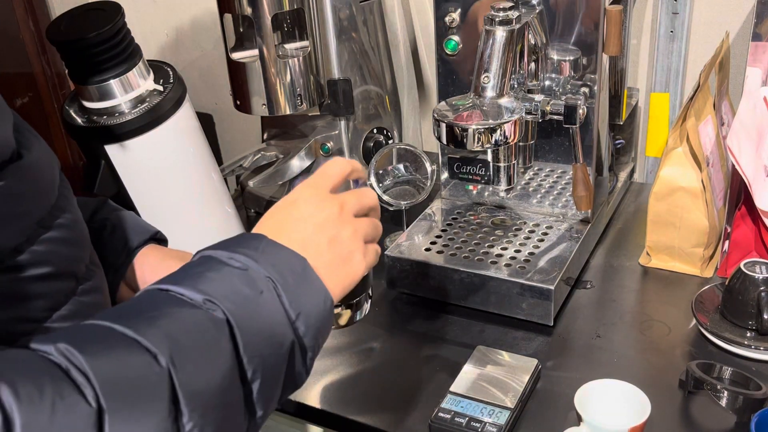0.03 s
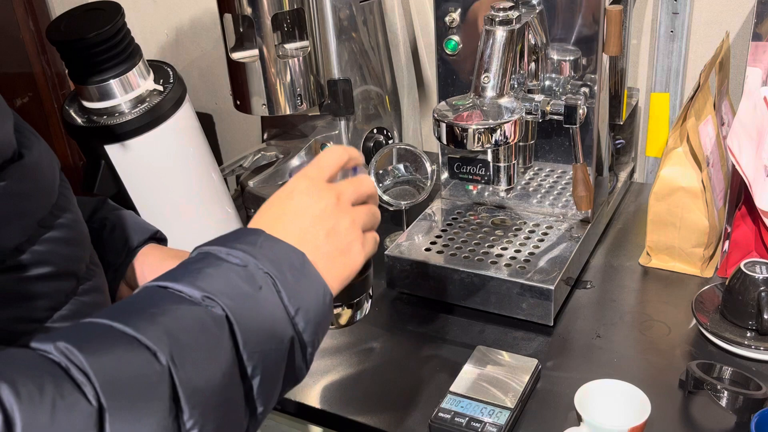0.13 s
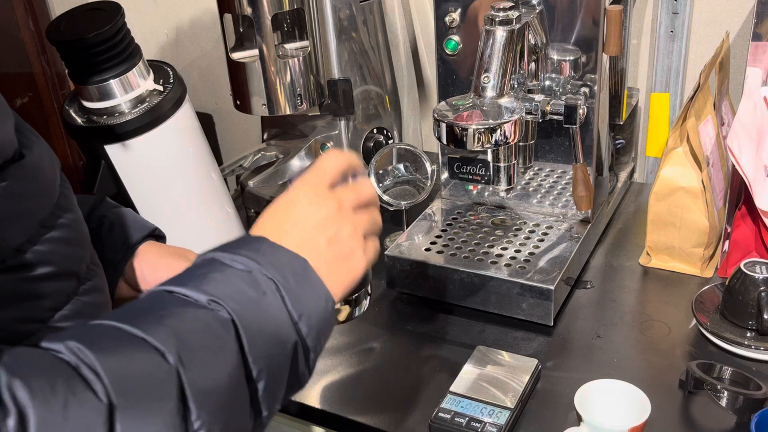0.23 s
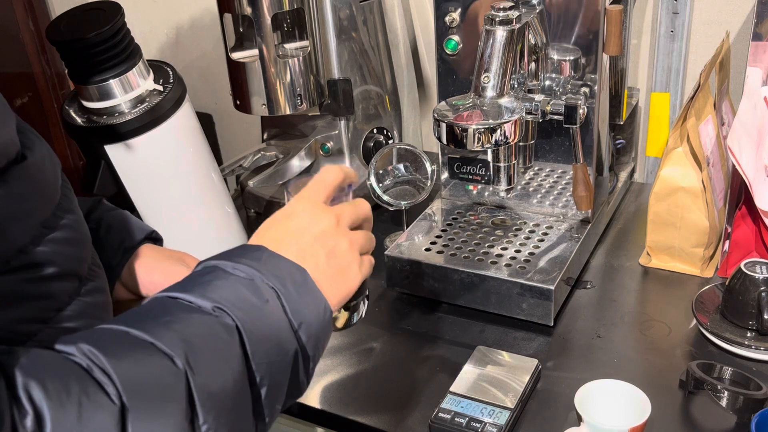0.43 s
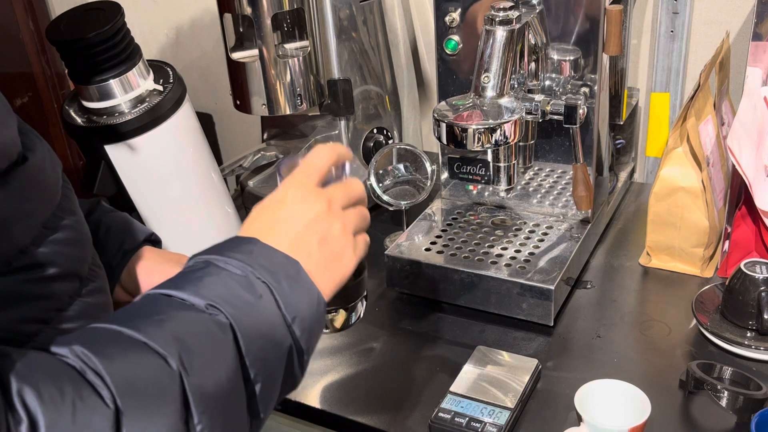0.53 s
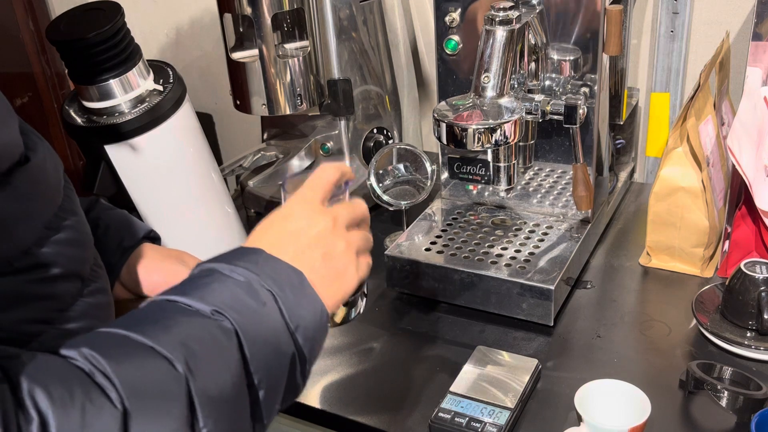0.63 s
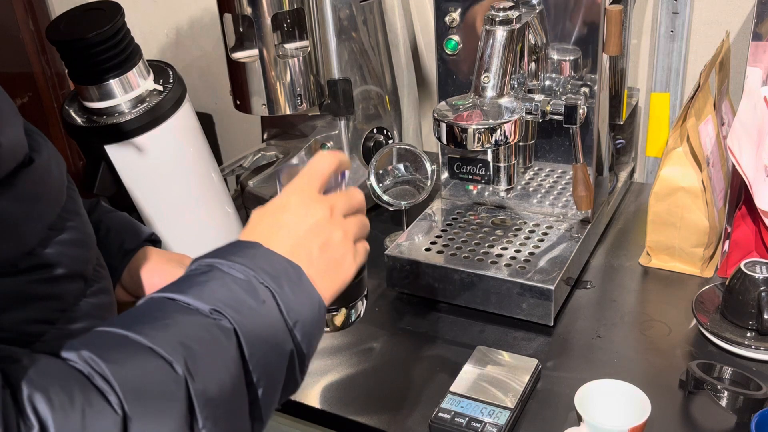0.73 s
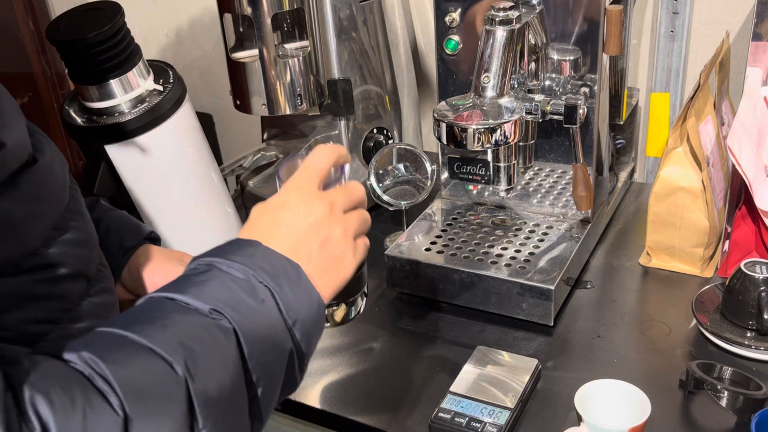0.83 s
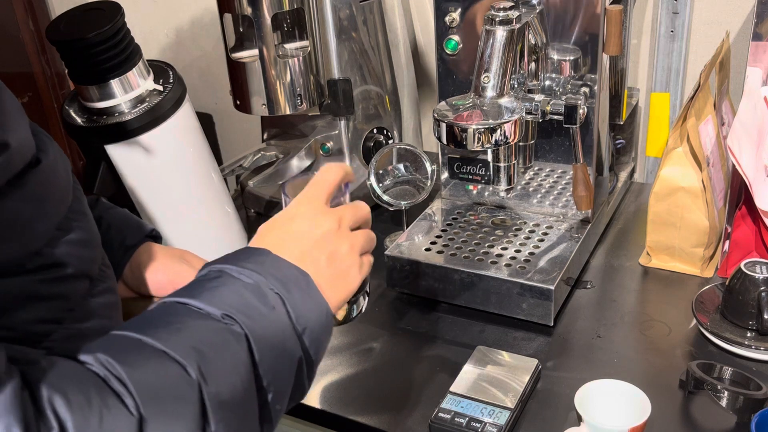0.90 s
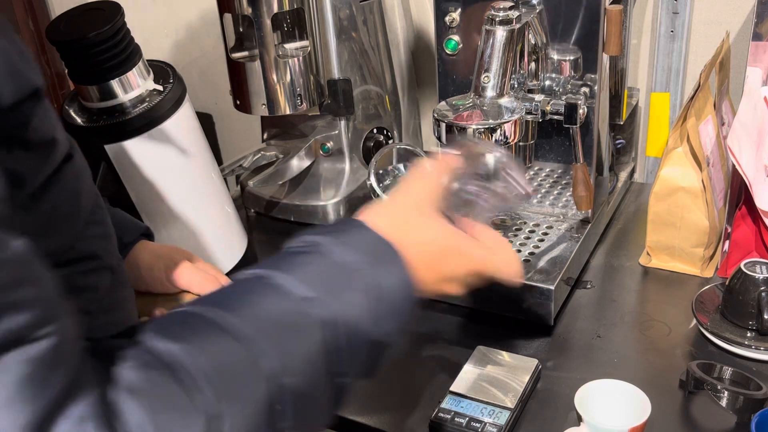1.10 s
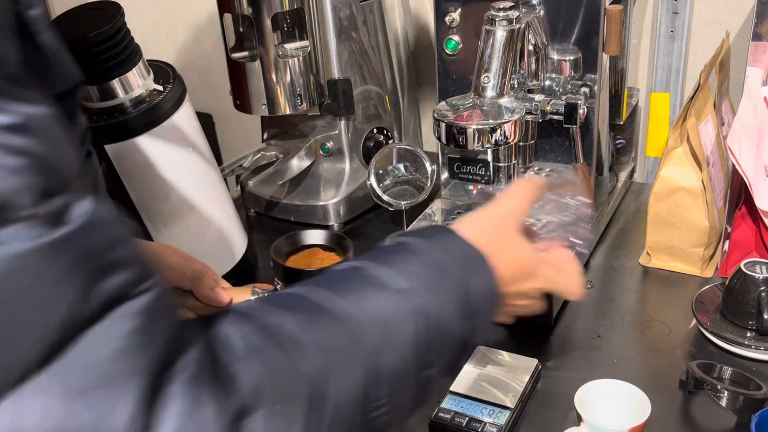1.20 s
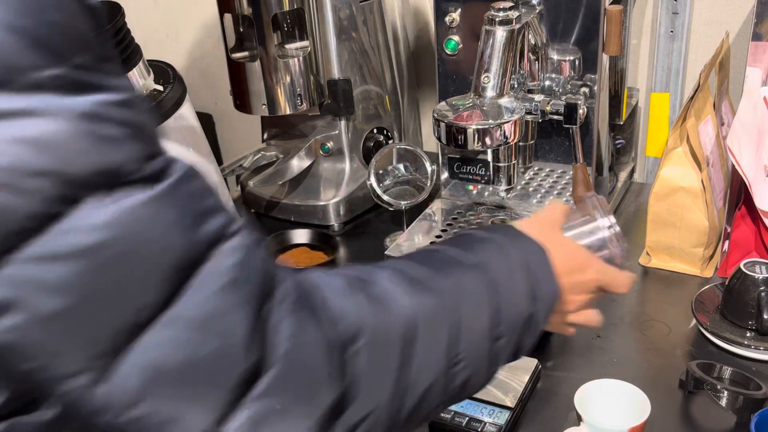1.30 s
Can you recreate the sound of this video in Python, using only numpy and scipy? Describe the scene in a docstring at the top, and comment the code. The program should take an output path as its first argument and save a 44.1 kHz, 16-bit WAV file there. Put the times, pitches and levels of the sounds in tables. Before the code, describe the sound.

A plastic cup knocks four times, quickly and evenly, on a metal coffee basket, each a sharp clatter with a hollow thud and brief ring. A faint sleeve rustle follows, close by in a small, quiet kitchen.

```python
"""Knocking a plastic cup empty

A plastic dosing cup scrapes into place, upside down on a metal coffee basket, and is knocked four times.
Each knock is a quick clatter of the rim over a hollow thud. Cup and basket ring briefly,
over a low lingering note of the small, quiet kitchen; machine, counter and room add echoes.
A sleeve rustles, and a faint brush follows as the cup is carried off."""
import sys
import numpy as np
from scipy import signal
from scipy.fft import rfft, irfft
from scipy.io import wavfile

SR = 44100
rng = np.random.default_rng(int(sys.argv[2]) if len(sys.argv) > 2 else 0)


def wav_out(sig):
    """Save sig, one row per channel (or a flat mono array), as 16-bit PCM at SR to the path in sys.argv[1]."""
    wavfile.write(sys.argv[1], SR, np.round(np.clip(np.atleast_2d(sig).T, -1, 1) * 32767).astype(np.int16))


N = 59535

# The tone of a touch on the cup. Each row: frequency in Hz, level in dB.
CONTACT_TONE = [(200, -19), (330, -2.5), (800, -4.5), (1150, -5), (1450, -6), (2000, -2), (2750, -7.5),
                (3700, 5), (4600, -1.5), (5700, -2.5), (6750, 0.5), (7400, -0.5), (8200, 6), (9100, -4),
                (10200, -0.5), (11500, -1), (13000, -22.5), (15200, -2)]


def gain(db):
    """Turn decibels into a number to multiply by."""
    return 10 ** (np.asarray(db) / 20)


def at_hz(points, hz):
    """Read a value between rows of (Hz, value), with octaves evenly spaced."""
    freqs, values = np.array(points, float).T
    return np.interp(np.log(np.maximum(hz, 1)), np.log(freqs), values)


def frequencies():
    """The frequencies in Hz at which the filters work."""
    return np.arange(N + 1) * SR / (2 * N)


def shape(sound, db):
    """Turn each frequency up or down by its own number of dB."""
    cepstrum = irfft(np.log(gain(db)))
    # folding the second half onto the first keeps the filter from sounding early
    cepstrum[1:N] *= 2
    cepstrum[N + 1:] = 0
    return irfft(rfft(sound, 2 * N) * np.exp(rfft(cepstrum)))[..., :N]


def since(start):
    """Seconds since a moment, zero before it."""
    return np.maximum(np.arange(N) / SR - start, 0)


def fade(start, fade_s):
    """Start suddenly, then die away. The fade time is how long a drop of 60 dB takes."""
    t = since(start)
    return (t > 0) * np.exp(-np.log(1000) * t / fade_s)


def noise(width):
    """Stereo hiss: width 0 is the same in both ears, width 1 is unrelated."""
    mid, side = rng.standard_normal((2, N))
    return np.array([mid + width * side, mid - width * side]) / np.sqrt(1 + width ** 2)


def shaped_noise(tone, width):
    """Stereo hiss with the given tone, scaled to a standard strength of 1."""
    hiss = shape(noise(width), at_hz(tone, frequencies()))
    return hiss / hiss.std()


def background():
    """The kitchen rumbles steadily: the bass sits in the middle, the hiss is wide."""
    # Each row: frequency in Hz, relative level in dB.
    rumble_tone = [(20, -10), (55, 0), (105, 5), (200, -7.5), (400, -4.5), (700, -18), (1300, -21),
                   (1900, -16), (4000, -38.5), (7000, -45), (11000, -53), (16000, -43)]
    mid, side = shape(rng.standard_normal((2, N)), at_hz(rumble_tone, frequencies()))
    width = np.clip(frequencies() / 610, .1, .7)
    side = shape(side, 20 * np.log10(width))
    return gain(-54.5) * np.array([mid + side, mid - side]) / mid.std()


def scrape():
    """A faint scrape dies away as the cup is set in place."""
    # Each row: frequency in Hz, relative level in dB.
    scrape_tone = [(600, -14), (1500, -11), (2200, 8.5), (2800, -13), (3600, -6), (5000, -18),
                   (9000, -11.5), (15000, -25)]
    return gain(-57.5) * fade(0, fade_s=0.23) * shaped_noise(scrape_tone, width=0.26)


def clatter():
    """The rim hits a few times in each knock, making short cracks; harder hits tend to be brighter."""
    # Each row: start in seconds, level in dB, brightness in dB per octave.
    rim_hits = [(0.22, -14.5, -7.5), (0.2227, -3.5, 2), (0.2265, -8.5, 1), (0.231, -6, -2.5),
                (0.237, -9.5, -5.5), (0.4240, -2, 2), (0.4268, -11.5, -8), (0.4400, -12, -1),
                (0.6340, -6, 0.5), (0.6362, -4.5, 1), (0.6400, -2, -1.5), (0.6418, -7.5, -5),
                (0.8462, -10, 2.5), (0.8491, 2, 0), (0.8515, -5.5, -3.5), (0.871, -14, -4.5)]
    pivot_hz = 4170  # brightness tilts the tone around this frequency
    octaves = np.log2(np.clip(frequencies(), pivot_hz / 4, SR) / pivot_hz)
    crack_db = at_hz(CONTACT_TONE, frequencies()) - 3.5
    out = 0
    for start, db, brightness in rim_hits:
        burst = noise(width=0.11) * fade(start, fade_s=0.02)
        out = out + shape(burst, crack_db + db + brightness * octaves)
    return out


def thuds():
    """The cup, damped by the hand, gives a short hollow note; the holder beneath adds a lower one."""
    # Each row: start in seconds, pitch in Hz, level in dB, fade time in seconds.
    cup_notes = [(0.2215, 631, -5, 0.031), (0.2283, 510, -16, 0.045), (0.4243, 553.5, -3.5, 0.023),
                 (0.6345, 670, -5.5, 0.026), (0.8470, 614, -7, 0.018)]
    rise_s, holder_pitch_ratio, bass_cut_hz = 0.0014, 0.601, 157
    out = 0
    for start, hz, db, fade_s in cup_notes:
        t = since(start)
        cup = fade(start, fade_s) * np.sin(2 * np.pi * hz * t)
        holder = gain(-12) * fade(start, fade_s=0.033) * np.sin(2 * np.pi * hz * holder_pitch_ratio * t)
        rise = 1 - np.exp(-t / rise_s)
        out = out - gain(db) * rise * (cup + holder)
    return signal.sosfilt(signal.butter(2, bass_cut_hz, "high", fs=SR, output="sos"), out)


def rings():
    """Cup and basket ring until the next knock, over a low lingering note of the kitchen."""
    # Each row: pitch in Hz, level in dB, fade time in seconds. The first row is the kitchen's note.
    ringing_notes = [(389.5, -23, 0.37), (1155, -12.5, 0.054), (1734.5, -18.5, .36), (1880, -13.5, 0.096),
                     (2677, -20.5, 0.11), (3190, -6.5, 0.054), (3550, 6, 0.023), (3647, -7.5, 0.15),
                     (3618, -17.5, 0.48), (3733, -5.5, 0.079), (3830, -8, 0.05), (4280, -15, 0.049),
                     (4930, -19, 0.15), (5130, -9, 0.063), (8070, -0.5, 0.032), (8140, -12.5, 0.065),
                     (8358, -27, 0.19)]
    # Each knock lands on another spot and wakes a different mix of notes.
    # Each row: start in seconds, then the change in dB for low, middle and high notes.
    knock_mixes = [(0.2236, 1, -3, 2.5), (0.4243, -7, -0.5, -37), (0.6369, -10.5, -8, 4),
                   (0.8490, 0, -9, -1.5)]
    group_edges_hz = (2500, 6000)
    choke_s, detune = 0.02, 0.00289
    out = np.zeros(N)
    for start, *group_db in knock_mixes:
        t = since(start)
        out = out * np.exp(-np.log(1000) * t / choke_s)  # this knock stops the previous ring
        for hz, db, fade_s in ringing_notes:
            group = np.searchsorted(group_edges_hz, hz)
            level = gain(db + group_db[group] - 13)
            pitch = hz * (1 + detune * rng.standard_normal())
            out = out + level * fade(start, fade_s) * np.sin(2 * np.pi * (pitch * t + rng.random()))
    return out


def kitchen(sound):
    """Quick echoes come off the machine and counter, then the room's echo fades octave by octave."""
    # Each row: frequency in Hz, level of the room's echo in dB.
    room_tone = [(125, 0), (250, -5.5), (500, -6), (1000, -6), (2000, -3.5), (4000, -4), (8000, -5.5),
                 (16000, -10.5)]
    # Each row: frequency in Hz, fade time in seconds.
    room_fades = [(200, 0.61), (1000, 0.6), (2000, 0.55), (4000, 0.57), (8000, 0.51), (15000, 0.3)]
    # Each row: frequency in Hz, how alike the echo is in both ears from 0 to 1.
    ear_likeness = [(150, 1), (500, 0.15), (1200, 0.031), (2500, 0.91), (9000, 0.74)]
    near = noise(width=0.39) * fade(0.001, fade_s=0.14)
    echoes = gain(-10.5) * near / np.sqrt(np.sum(near ** 2) / 2)
    octaves_hz = 125 * 2. ** np.arange(8)
    for hz in octaves_hz:
        this_octave = list(zip(octaves_hz, octaves_hz == hz))
        band = np.sqrt(at_hz(this_octave, frequencies()))
        alike = at_hz(ear_likeness, hz)
        hiss = noise(width=np.sqrt((1 - alike) / (1 + alike)))
        air = irfft(rfft(hiss, 2 * N) * band)[:, :N]
        tail = fade(0.0088, at_hz(room_fades, hz))
        echoes = echoes + gain(at_hz(room_tone, hz) - 1) * air * tail / np.sqrt(np.sum(tail ** 2))
    return signal.fftconvolve(sound, echoes, axes=1)[:, :N]


def out_of_step(sound):
    """The sound reaches the left and right microphone openings slightly out of step."""
    # Each row: frequency in Hz, how far the left wave is ahead in radians (negative is behind).
    left_lead = [(2000, 0.5), (3550, 0.24), (4200, 0.38), (5200, 0.5), (5900, -0.96), (6700, -3),
                 (7100, -4.5), (8000, -5.5), (8800, -8.5), (9700, -6), (12000, -9.5), (13600, -11),
                 (15300, -10.5)]
    left_louder_db = 0.3
    sides = np.array([[.5], [-.5]])
    shift = np.exp(1j * sides * at_hz(left_lead, frequencies()))
    return irfft(rfft(sound, 2 * N) * shift)[:, :N] * gain(sides * left_louder_db)


def sleeve():
    """A jacket sleeve rustles, growing louder as the arm swings away."""
    # Each row: frequency in Hz, relative level in dB.
    cloth_tone = [(100, -6), (400, -2), (900, -6), (1700, 4), (2700, -5), (4500, -2.5), (6700, -11),
                  (9000, -7.5), (15000, -23)]
    start_s, rise_s = 0.74, 0.58
    swell = np.minimum(since(start_s) / rise_s, 1)
    return gain(-56.5) * swell * shaped_noise(cloth_tone, width=0.48)


def brush():
    """The cup is brushed lightly once on its way out."""
    peak_s, spread_s = 1.258, 0.0092
    touch = np.exp(-.5 * ((np.arange(N) / SR - peak_s) / spread_s) ** 2)
    return gain(-50.5) * touch * shaped_noise(CONTACT_TONE, width=0.55)


def scene():
    """Four knocks and their echoes, with soft handling sounds over the kitchen's rumble."""
    knocks = clatter() + thuds()
    ring = rings()
    echoes = kitchen(knocks + gain(-2) * ring)  # the ring faces the listener, so less reaches the walls
    return out_of_step(knocks + ring + echoes) + scrape() + sleeve() + brush() + background()


def record(dry):
    """Round off the highest peaks and cut the very top of the treble."""
    top_hz = 16000
    treble_cut = signal.ellip(8, .2, 80, top_hz, fs=SR, output="sos")
    return signal.sosfilt(treble_cut, np.tanh(dry))


dry = scene()
out = record(dry)
wav_out(out)
```